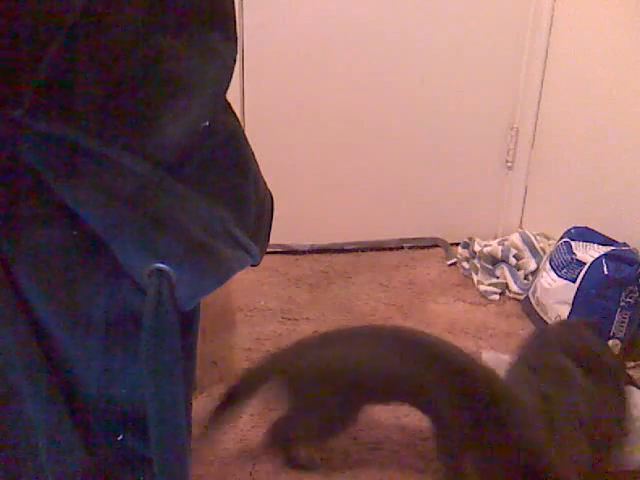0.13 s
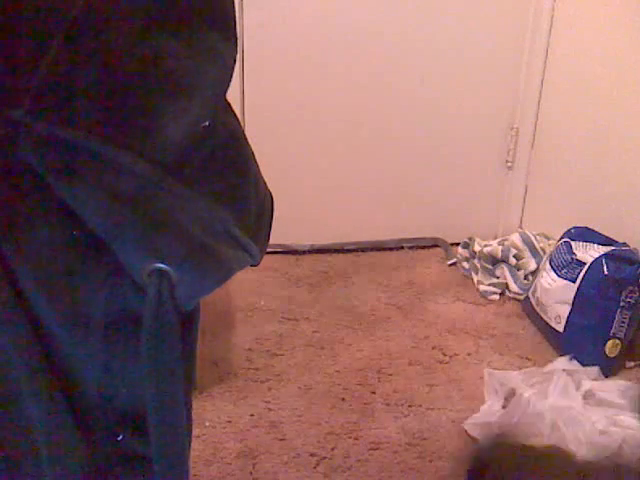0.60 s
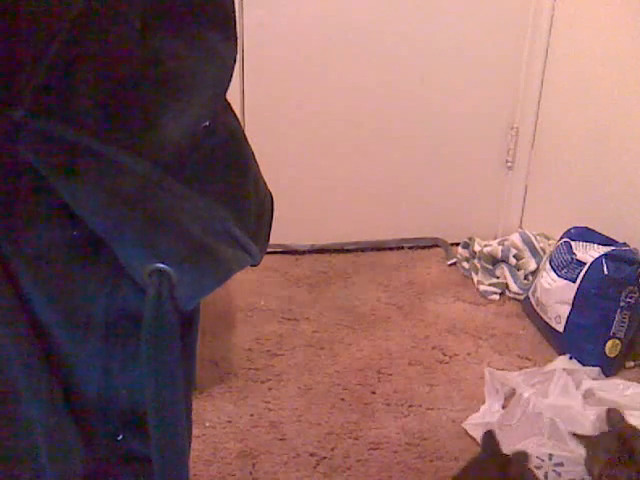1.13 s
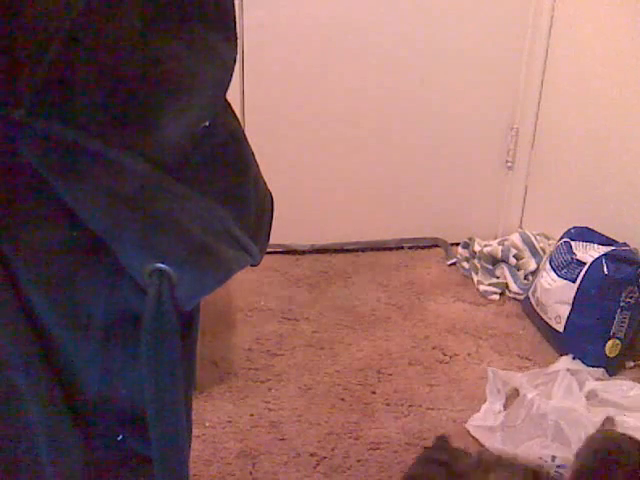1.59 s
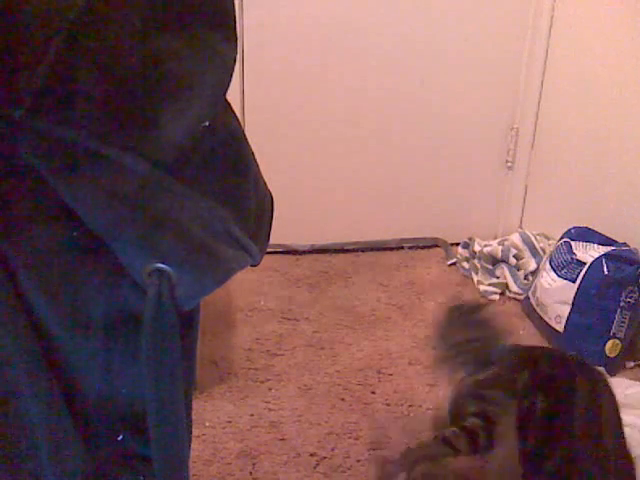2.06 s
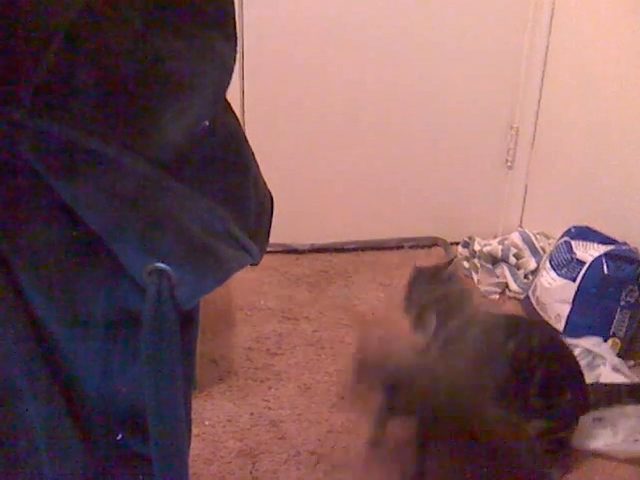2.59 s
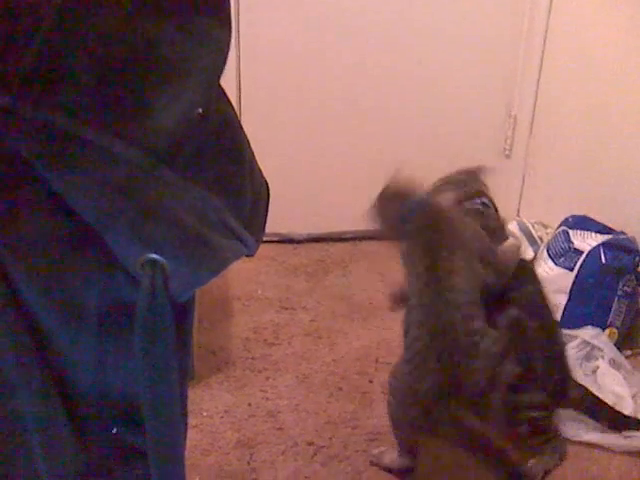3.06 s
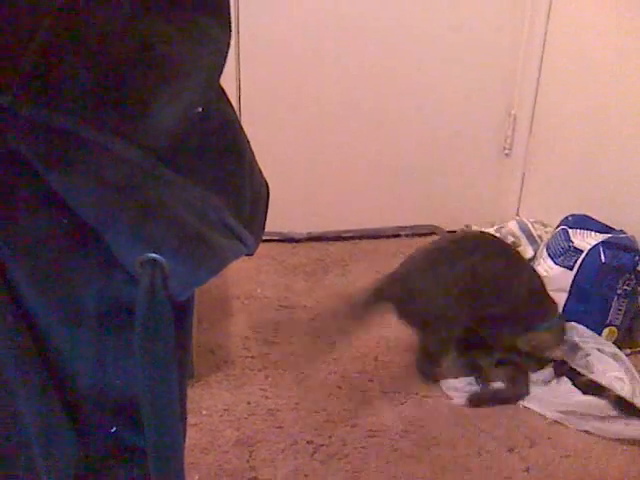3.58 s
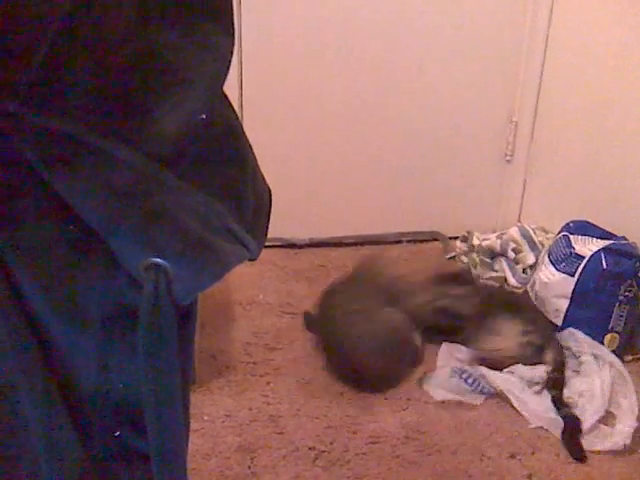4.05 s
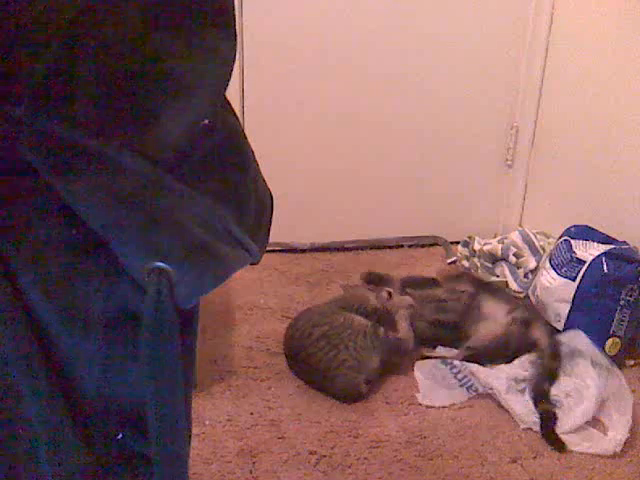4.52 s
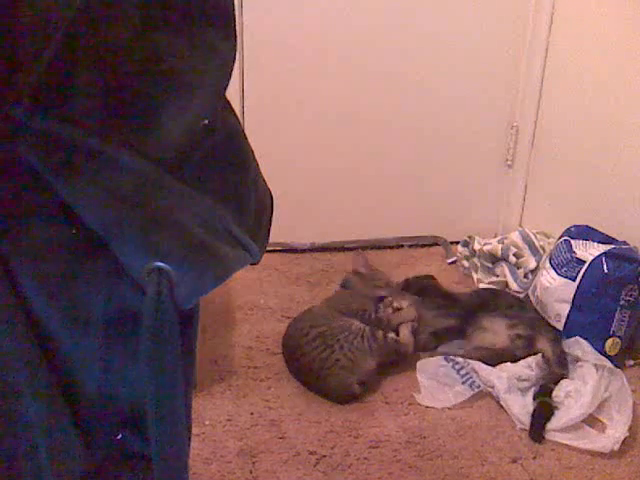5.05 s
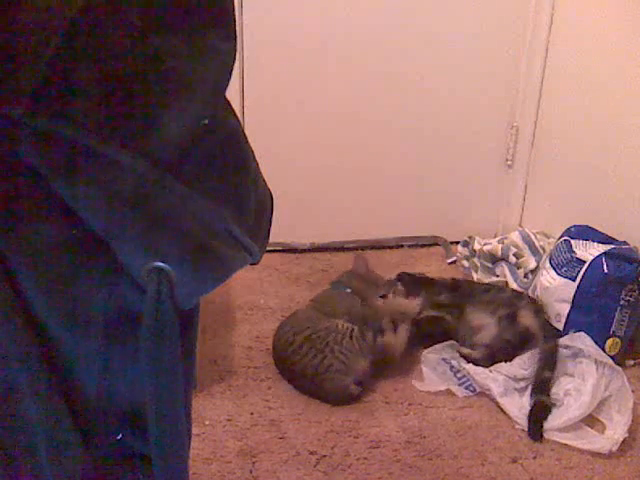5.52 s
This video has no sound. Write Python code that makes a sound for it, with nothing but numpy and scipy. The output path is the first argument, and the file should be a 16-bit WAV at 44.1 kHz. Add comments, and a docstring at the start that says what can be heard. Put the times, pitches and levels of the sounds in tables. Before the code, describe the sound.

Crinkling plastic, small jingling bell and muffled body bumps as kittens wrestle indoors, with sudden hard clacks close by over faint hiss.

```python
"""A small quiet carpeted room, two kittens wrestling near a cheap built-in microphone.
A plastic bag rustles under them: random crease snaps and smooth noise, shaped crush by crush.
A collar bell tinkles as beating, decaying modes; bodies thud into the floor as soft low cycles and rumble.
Close by, claws and paws knock something hard and hollow: cracks and rattles ring its modes.
Behind it all lie hiss and a faint whine; the bag, bell and knocks also echo in the room."""
import sys
import numpy as np
from scipy import signal
from scipy.io import wavfile
from scipy.ndimage import uniform_filter1d

SR = 44100
rng = np.random.default_rng(int(sys.argv[2]) if len(sys.argv) > 2 else 0)


def ratio(d):
    """dB to gain"""
    e = np.asarray(d, float) / 20
    return 10 ** e


def persist_wave(psi):
    """Save psi, clipped to +-1, as 16-bit WAV."""
    counts = np.round(np.clip(psi, -1, 1) * 32767).astype(np.int16)
    wavfile.write(sys.argv[1], SR, np.atleast_2d(counts).T)


N = 248664


def evened(x):
    """Scales to rms 1."""
    return x / np.sqrt(np.mean(x ** 2) + 1e-20)


def read(points, hz):
    """A spectrum joined by straight lines on a log frequency axis."""
    f, value = np.transpose(points)
    return np.interp(np.log(hz + 1), np.log(f + 1), value)


def add(mix, s, sound):
    """Mixes a sound in at s seconds."""
    part = mix[round(s * SR):][:len(sound)]
    part += sound[:len(part)]


def resonate(x, hz, width):
    """A resonance of gain 1 at its centre, width in Hz."""
    pole = np.exp((2j * np.pi * hz - np.pi * width) / SR)
    return 2 * signal.lfilter([1 - abs(pole)], [1, -pole], x).real


def frames(x, size):
    """Short-time spectra with their bins and times."""
    return signal.stft(x, SR, nperseg=size, noverlap=3 * size // 4)


def joined(z, size):
    """Back from short-time spectra to sound."""
    return signal.istft(z, SR, nperseg=size, noverlap=3 * size // 4)[1][:N]


def patches(hz, t, size):
    """Random blotches over frequency and time, rms 1; size in (bins, frames)."""
    blotches = rng.standard_normal((len(t), len(hz))).T
    blotches = uniform_filter1d(blotches, size=size[0], axis=0)
    return evened(uniform_filter1d(blotches, size=size[1], axis=1))


# colour of the background hiss as recorded, including its treble limit near 11 kHz:
# (frequency [Hz], relative level [dB per Hz])
FLOOR = [(12, -31), (20, 6), (133, -3.5), (174, -6.5), (239, -5.5), (398, -9), (910, -10.5), (1290, -17),
         (1510, -14), (4280, -36), (5440, -59), (8120, -28), (10900, -38), (11800, -64), (15300, -86),
         (22000, -120)]
FLOOR_DB = -58.5  # rms
WHINE_HZ, WHINE_DB = 1049, -74  # centre, rms


def room_tone():
    """Air and microphone hiss as coloured noise with a slight drift, and narrow noise as a faint fuzzy whine."""
    hz, t, z = frames(rng.standard_normal(N), size=2048)
    colour_db = read(FLOOR, hz)[:, None]
    drift_db = 1.2 * patches(hz, t, size=(60, 10))
    hiss = joined(z * ratio(colour_db + drift_db), size=2048)
    whine = resonate(rng.standard_normal(N), WHINE_HZ, 9)
    return ratio(FLOOR_DB) * evened(hiss) + ratio(WHINE_DB) * evened(whine)


ROOM_T60, ROOM_DB = 0.2, -15.5  # s, level of the echoes against the direct sound


def room(x):
    """Sparse echoes of random sign that die quickly among soft furnishings."""
    taps = np.zeros(SR // 3)
    at = np.arange(200, SR // 3 - 22, 22)
    at = at + rng.integers(0, 22, len(at))  # one echo somewhere in every 22 samples
    taps[at] = rng.choice([-1., 1.], len(at))
    taps *= ratio(-60 * np.arange(len(taps)) / SR / ROOM_T60)
    return signal.fftconvolve(x, taps / np.linalg.norm(taps))[:N]


# paws and bodies landing, carried by the floor:
# (time of fullest swell [s], swell level [dB], frequency [Hz], length before the haste factor [s])
THUDS = [(0.41, -49, 234.4, 0.046), (0.422, -44, 55, 0.012), (0.532, -45.5, 296, 0.026),
         (0.62, -38, 215, 0.038), (0.629, -35.5, 46.3, 0.027), (0.677, -45, 210, 0.0094),
         (0.68, -46, 52, 0.015), (0.717, -40.5, 200, 0.018), (0.724, -46.5, 73.4, 0.036),
         (0.811, -28.5, 39.3, 0.013), (0.841, -22, 32.3, 0.023), (0.86, -49.5, 231, 0.045),
         (0.869, -27.5, 22.2, 0.036), (0.92, -34.5, 26, 0.035), (0.949, -42.5, 22.9, 0.046),
         (0.952, -49, 204, 0.013), (0.983, -39, 220, 0.0083), (0.999, -26.5, 58, 0.01),
         (1.019, -42.5, 148.4, 0.028), (1.027, -34.5, 66.5, 0.015), (1.091, -46, 53.5, 0.031),
         (1.976, -50, 225, 0.02), (2.002, -53, 60.4, 0.017), (2.154, -44, 61, 0.015),
         (2.387, -29.5, 261, 0.015), (2.412, -40, 59.5, 0.017), (2.435, -25, 281.5, 0.019),
         (2.465, -40, 316, 0.0023), (2.471, -29, 72, 0.0098), (2.505, -28, 65.4, 0.019),
         (2.563, -48, 231, 0.018), (2.59, -48, 50.7, 0.018), (2.712, -29, 62, 0.028),
         (2.724, -44, 258, 0.031), (2.881, -35.5, 58.3, 0.0336), (2.976, -52, 48, 0.012),
         (2.977, -46, 225, 0.0094), (3.375, -51, 47.7, 0.019), (3.489, -47.5, 245, 0.028),
         (3.5, -38.5, 56, 0.031), (3.646, -42, 44.7, 0.025), (3.723, -50, 54.6, 0.019),
         (3.829, -47, 60.4, 0.022), (3.838, -37.5, 224, 0.028), (3.865, -34, 64, 0.015),
         (3.926, -43, 56, 0.017), (4.034, -46.5, 55, 0.021), (4.215, -42, 220, 0.028),
         (4.224, -27, 45.6, 0.02), (4.27, -33, 33.4, 0.029), (4.332, -41, 45, 0.0076),
         (4.348, -49.5, 256, 0.015)]


def thuds(haste=1.3, loose_hz=330, shudder_db=-11, linger=12.7):
    """A few soft cycles of the floor, looser the higher they lie, then a rumbling shudder."""
    out = np.zeros(N)
    t = np.arange(SR // 3) / SR
    for s, db, hz, length in THUDS:
        u = haste * t / length
        swell = u ** 2 * np.exp(2 - 2 * u)  # fullest, at 1, where u is 1
        turn, noise = rng.random(), rng.standard_normal(len(t))
        rumble = evened(resonate(resonate(noise, hz, 1.5 * hz), hz, 1.02 * hz))
        loose = min(hz / loose_hz, .9)  # share of rumble in the cycles
        tone = np.sin(2 * np.pi * (hz * t + turn))
        cycles = np.sqrt(1 - loose ** 2) * tone + loose * 0.59 * rumble
        shudder_t60 = linger * length + 0.08
        shudder = ratio(shudder_db - 60 * t / shudder_t60) * (1 - np.exp(-u ** 2)) * rumble
        add(out, s - length / haste, ratio(db) * (swell * cycles + shudder))
    return out


# modes of the collar bell: (frequency [Hz], split of the mode pair [Hz], t60 [s], fuzz [0-1])
BELL = [(3747, 11, 0.053, 1), (5090, 11, 0.1, 0.64), (8790, 27, 0.21, 0.7), (10170, 21, 0.15, 1),
        (11570, 30, 0.05, 0.4)]
# the pea knocks the bell:
# (time [s], strength [dB], place on the wall [turns], focus [dB], half the loss at the far side)
TINKLES = [(0.073, -60, 0.67, 19), (0.196, -45.0, 0.57, 4.5), (0.243, -40, 0.44, 6.5),
           (0.274, -48, 0.4, 18), (0.647, -48, 0.44, 18), (0.666, -37, 0.31, 12), (0.69, -32, 0.13, 17),
           (0.704, -38, 0.94, 12), (0.719, -48, 0.13, 8), (0.749, -45, 0.34, 9), (0.758, -40.0, 0.41, 18),
           (0.813, -47, 0.08, 19), (0.823, -56, 0.47, 4), (0.844, -49.5, 0.52, 3),
           (0.871, -44.5, 0.21, 6.5), (0.887, -51, 0.17, 4), (0.922, -53.5, 0.79, 15),
           (0.935, -47.5, 0.42, 17), (0.976, -56.5, 0.5, 1), (0.998, -49, 0.3, 13), (1.033, -62, 0.35, 19),
           (1.429, -53, 0.4, 11), (1.897, -46, 0.93, 19.5), (2.005, -47, 0.39, 20),
           (2.063, -54.5, 0.15, 13), (2.155, -64, 0.63, 15), (2.197, -37.5, 0.36, 19),
           (2.213, -38.5, 0.42, 21), (2.266, -48, 0.55, 18), (2.295, -45, 0.88, 18),
           (2.617, -47.5, 0.22, 14), (2.633, -35, 0.0, 21), (2.667, -28, 0.09, 14),
           (2.676, -30.5, 0.14, 13), (2.693, -41, 0.09, 8), (2.738, -55.0, 0.92, 5),
           (2.76, -44.5, 0.45, 18), (2.78, -38.5, 0.43, 18), (2.83, -46, 0.89, 22),
           (2.849, -53.5, 0.61, 18), (2.893, -57, 0.34, 20), (2.968, -39.5, 0.34, 18),
           (3.002, -36, 0.51, 25), (3.019, -42.5, 0.46, 20), (3.222, -38, 0.06, 4.5),
           (3.249, -29, 0.88, 24), (3.26, -34.0, 0.99, 13), (3.296, -31.5, 0.5, 17), (3.308, -42, 0.83, 2),
           (3.4, -38.0, 0.51, 22), (3.49, -42.5, 0.41, 13), (3.758, -70, 0.34, 26), (3.799, -42, 0.56, 28),
           (3.813, -49, 0.34, 20), (4.214, -54, 0.34, 20), (4.43, -45.5, 0.0, 26), (4.46, -62, 0.55, 12),
           (4.607, -57, 0.34, 20), (5.013, -52.5, 0.44, 32), (5.295, -65, 0.67, 15)]
# where on the wall each bell mode answers best: (place [turns], level [dB])
BELL_PLACES = [(0, 0), (0.52, -9.5), (.33, -1), (.67, 1), (0.71, -8)]


def bell(tick_db=-16, side_hz=8280, side_db=-19, jolt=0.97, waver=.0015):
    """Each knock of the pea sets every mode to a new level, higher the nearer it lands to that
    mode's place; between knocks the modes beat and die away."""
    s, strength_db, place, focus_db = np.transpose(TINKLES)
    levels_db = [strength_db + db - focus_db * (1 - np.cos(2 * np.pi * (place - best)))
                 for best, db in BELL_PLACES]
    t = np.arange(N) / SR
    last = np.searchsorted(s, t) - 1  # the latest knock
    struck = last >= 0
    since = abs(t - s[last])
    out = np.zeros(N)
    modes = [(*mode, db) for mode, db in zip(BELL, levels_db)]
    # a weak mode sounds along with the lowest
    modes.append((side_hz, *BELL[0][1:], levels_db[0] + side_db))
    for hz, split_hz, t60, rolling, db in modes:
        # each knock jolts the phase (radians)
        phases = jolt * np.cumsum(rng.standard_normal((len(s), 2)), axis=0)
        one, two = np.exp(1j * phases[last].T)
        # a slight random detune at each knock
        detune_hz = waver * hz * rng.standard_normal(len(s))[last]
        detune = np.exp(2j * np.pi * detune_hz * since)
        # the pea rolls along the wall
        a, b = uniform_filter1d(rng.standard_normal((2, N)), size=150)
        fuzz = rolling * (evened(a) + 1j * evened(b)) / 2
        partner = .4 * two * np.exp(2j * np.pi * split_hz * since)
        decay = ratio(db[last] - 60 * since / t60) * struck
        swing = decay * detune * (one + partner + fuzz)
        softened = signal.lfilter([.02], [1, -.98], swing)  # no abrupt steps at the knocks
        out += (softened * np.exp(2j * np.pi * hz * t)).real
    tick_level_db = np.max(levels_db, axis=0)[last] + tick_db
    ticks = ratio(tick_level_db - 60 * since / .006) * struck * rng.standard_normal(N)
    return out + resonate(ticks, 6500, 5000)


# modes of the hollow thing close by:
# (frequency [Hz], width before each drive's factor [Hz], level [dB])
HOLLOW = [(220, 17, 13), (400, 78, 3.5), (462.5, 27, 0), (664, 61, -2.5), (915, 62, -1), (1130, 250, 3),
          (1347, 180, 4), (1640, 120, -2), (2210, 240, 4), (2800, 114, 4.5), (3030, 220, 0.5),
          (3740, 660, 4.5), (5320, 47, 3), (5930, 180, 2.5), (8320, 220, -22)]
# knocks on it: (time [s], crack level [dB], crack centre [Hz], rattle level [dB], rattle t60 [s])
# the rattle centre starts from the crack's and sinks after hard blows
KNOCKS = [(0.24, -42, 4520, -46, 0.051), (.522, -42.5, 650, -42.5, 0.18), (0.812, -56, 3000, -58, .05),
          (1.389, -48, 2580, -49, 0.036), (2.133, -51, 2710, -54, 0.044), (2.385, -11, 2800, -24, 0.25),
          (2.386, -25.5, 1300, -30, 0.09), (2.393, -28, 2710, -47, 0.031), (2.409, -48, 1300, -48, 0.13),
          (2.429, -23.5, 1060, -20.5, 0.14), (2.457, -31.5, 3460, -57, 0.043),
          (2.47, -40, 362, -35.5, 0.11), (2.54, -51, 4000, -56, .05), (2.685, -40, 1450, -38, 0.044),
          (2.709, -24, 960, -31, 0.1), (2.719, -28.5, 3370, -43, 0.044), (2.739, -30.5, 1640, -41.5, 0.22),
          (2.944, -17, 3000, -32, 0.088), (2.948, -34.5, 4500, -33, 0.021), (3.226, -52, 3460, -48, .04),
          (3.296, -53, 4500, -47, 0.033), (3.2998, -56, 4200, -40, 0.055), (3.307, -57, 4000, -51, .03),
          (4.037, -47.5, 1300, -60, .04), (4.094, -43, 2800, -46, 0.028), (4.341, -42.5, 1380, -40, 0.03),
          (4.428, -48, 4050, -62.5, 0.038), (5.126, -54, 3330, -47.5, .05)]
SINK_OCTAVES_PER_DB = .035  # a hard blow leaves its rattle in lower modes


def ring_hollow(drive, centre_hz, octaves, wide):
    """Sounds the modes of the hollow thing that lie near a centre, loudest stretch at rms 1."""
    rung = np.zeros(len(drive))
    for k, (hz, width, mode_db) in enumerate(HOLLOW):
        off_centre = np.log2(hz / centre_hz) / octaves
        gain = (-1) ** k * ratio(mode_db - 4.1 * off_centre ** 2)
        rung += gain * resonate(drive, hz, wide * width) / np.sqrt(width)
    return rung / np.sqrt(uniform_filter1d(rung ** 2, size=100).max())


def knocks(soft_octaves=0.19, rattle_octaves=0.66, click_db=10, rebound=0.65, top_hz=7000):
    """The contact push, a sharp crack and a rattling tail; the last two ring the hollow modes."""
    out = np.zeros(N)
    t = np.arange(SR // 4) / SR
    for s, crack_db, crack_hz, rattle_db, t60 in KNOCKS:
        a, b, lumps = rng.standard_normal((3, len(t)))
        crack = (a + 7 * (t == 0)) * ratio(-60 * t / .009)
        # harder blows reach more modes
        crack_octaves = soft_octaves + .035 * max(crack_db + 40.5, 0)
        rattle_hz = crack_hz * 2 ** (-SINK_OCTAVES_PER_DB * max(crack_db + 35.5, 0))
        lumps_db = 2.8 * evened(uniform_filter1d(lumps, size=90))
        rattle = b * ratio(-60 * t / t60 + lumps_db) * (1 - np.exp(-t / 0.00098))
        # the contact itself, one short push and its rebound
        u = (t - .0003) * crack_hz * 5
        push = np.exp(-u ** 2) - rebound / 3 * np.exp(-(u / 3) ** 2)
        add(out, s, ratio(crack_db + click_db) * push)
        add(out, s, ratio(crack_db) * ring_hollow(crack, crack_hz, crack_octaves, wide=2.2))
        add(out, s, ratio(rattle_db) * ring_hollow(rattle, rattle_hz, rattle_octaves, wide=1.1))
    # soft paws and plastic give little extreme treble
    return signal.lfilter(*signal.butter(3, top_hz, fs=SR), out)


# each crush of the bag:
# (time of peak [s], peak level [dB], rise [s], fall [s], brightness [dB per octave above the knee])
CRUSHES = [(0.0, -53.5, .05, 0.12, -6), (0.123, -42, .07, 0.1, 1), (.29, -52.5, 0.1, 0.096, 4.5),
           (.48, -61.5, 0.24, 0.12, -6), (0.556, -50.5, 0.095, 0.16, 0), (.7, -65.5, 0.15, 0.2, 8),
           (.831, -58, 0.051, 0.021, 2.5), (.9, -71.5, 0.13, 0.12, 20.5), (1.398, -53.5, 0.031, 0.075, 2.5),
           (1.55, -66.5, 0.13, 0.13, -5.5), (2.146, -48.5, 0.032, 0.083, 1), (2.27, -72, .15, .2, 14.5),
           (2.346, -47.5, 0.017, 0.11, -0.5), (2.391, -43.5, 0.063, 0.12, 7.5),
           (2.44, -42.5, 0.094, 0.09, -1), (2.56, -63, .15, 0.11, -0.2), (2.65, -64, .08, 0.092, 7),
           (2.69, -43, 0.02, 0.018, 4.5), (2.74, -57, 0.079, .13, -1), (2.9, -56.5, 0.17, 0.082, 2.5),
           (2.96, -45, 0.041, 0.097, 4.5), (3.007, -47, .1, 0.017, -15), (3.24, -59, 0.055, 0.13, -13),
           (3.29, -53.5, 0.07, 0.3, 18.5), (3.39, -42, 0.18, 0.33, 0), (3.609, -42.5, 0.12, 0.068, -1.5),
           (3.69, -51, 0.087, 0.083, -4.5), (3.871, -44, 0.19, .2, -1), (4.09, -54, 0.21, 0.45, -3),
           (4.24, -44, 0.2, 0.21, -1.5), (4.34, -46.5, 0.15, 0.057, -4.5), (4.56, -52, 0.2, 0.18, -4),
           (4.73, -50, 0.15, 0.12, -3), (4.92, -63.5, 0.15, 0.075, -7.5), (5.135, -52, 0.033, 0.22, -4.5),
           (5.21, -46, 0.11, 0.11, -3.5), (5.31, -54.5, 0.11, 0.12, -6)]
FADE_DB, FADE_POWER = 23, 1.2  # level lost over one rise or fall time, and how rounded the peak is
REST_DB, REST_BRIGHT_DB = -76, 2  # the bag creeps faintly between crushes
# slope of the low swish against crush force, from the force (dB) where it is neutral, and its lowest dB
SWISH_FROM_DB, SWISH_SLOPE, SWISH_LEAST_DB = -43.5, 1.76, -6.5


def crushing(t):
    """Level, brightness and force of the bag's crushes, overlapping ones adding their power."""
    s, peak_db, rise, fall, bright_db = np.transpose(CRUSHES)[:, :, None]
    away = np.where(t < s, (s - t) / rise, (t - s) / fall)
    power = ratio(peak_db - FADE_DB * away ** FADE_POWER) ** 2
    rest = ratio(REST_DB) ** 2
    total = power.sum(0) + rest
    brightness = ((power * bright_db).sum(0) + rest * REST_BRIGHT_DB) / total
    force = ((power * peak_db).sum(0) + rest * SWISH_FROM_DB) / total
    return 10 * np.log10(total), brightness, force


# colour of the rustle as recorded, including the treble limit near 11 kHz:
# (frequency [Hz], relative level [dB per Hz])
BAG = [(300, -8.5), (700, -6), (1350, -8.5), (1600, -3), (1950, -6.5), (2300, -0.5), (3700, -3.5),
       (5200, -7.5), (8000, -14.5), (10900, -19.5), (11900, -64)]
# how strongly an air pocket in the bag rings: (time [s], level [dB])
POCKET = [(0.0, -11), (2.3, -5), (2.459, 17), (2.6, -13), (3.4, -10.5), (4.2, -3.5), (4.4, -18), (4.6, -6),
          (4.75, -13.5), (5.149, 4.5), (5.64, 6.5)]
BAG_KNEE_HZ, SWISH_HZ, POCKET_HZ, POCKET_WIDTH_HZ = 3000, 1300, 1637, 60
OVERTONE, OVERTONE_DB = 1.398, -12.5  # the pocket's second ring: pitch ratio, level
CREASES_PER_S = 9000


def bag(spread_db=1.5, smooth=0.66, patchy_db=2.0):
    """Thousands of creases snap each second over a smooth scuff of fur; crushes set level and brightness."""
    size = ratio(spread_db * np.minimum(rng.exponential(1, N), 5))
    creases = size * rng.standard_normal(N) * (rng.random(N) < CREASES_PER_S / SR)
    rustle = evened(evened(creases) + smooth * rng.standard_normal(N))
    hz, t, z = frames(rustle, size=256)
    level_db, bright_db, force_db = crushing(t)
    colour = ratio(read(BAG, hz))
    colour /= np.sqrt(np.mean(colour ** 2 * (hz > 1500) * (hz < 3400)))
    high_db = np.log2(np.maximum(hz, BAG_KNEE_HZ) / BAG_KNEE_HZ)[:, None] * bright_db
    # heavy crushes push out a low swish, light ones hold it back
    swish_db = np.maximum(SWISH_SLOPE * (force_db - SWISH_FROM_DB), SWISH_LEAST_DB)
    low_db = swish_db / (1 + (hz[:, None] / SWISH_HZ) ** 6)
    uneven_db = patchy_db * patches(hz, t, size=(4, 14))
    out = joined(z * colour[:, None] * ratio(level_db + high_db + low_db + uneven_db), size=256)
    ring = resonate(out, POCKET_HZ, POCKET_WIDTH_HZ)
    ring += ratio(OVERTONE_DB) * resonate(out, OVERTONE * POCKET_HZ, POCKET_WIDTH_HZ)
    ring_db = np.interp(np.arange(N) / SR, *np.transpose(POCKET))
    return out + ratio(ring_db) * ring


def scene():
    """All sources; what travels through the air also echoes."""
    air = bag() + bell() + knocks()
    mix = air + ratio(ROOM_DB) * room(air) + thuds() + room_tone()
    return mix[None]  # one channel


def low_pass(x):
    """Removes everything above the highest recorded frequency."""
    return signal.sosfilt(signal.butter(12, 12020, fs=SR, output="sos"), x)


def record(dry):
    """Passes the finished mix on to its last stage."""
    return low_pass(dry)


dry = scene()
out = record(dry)
persist_wave(out)
```